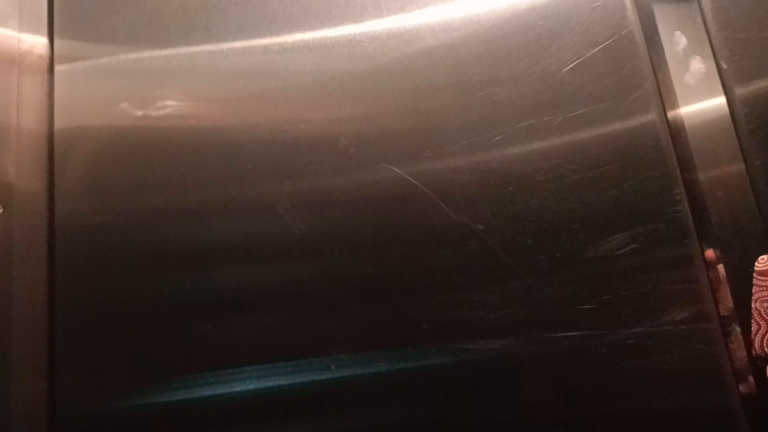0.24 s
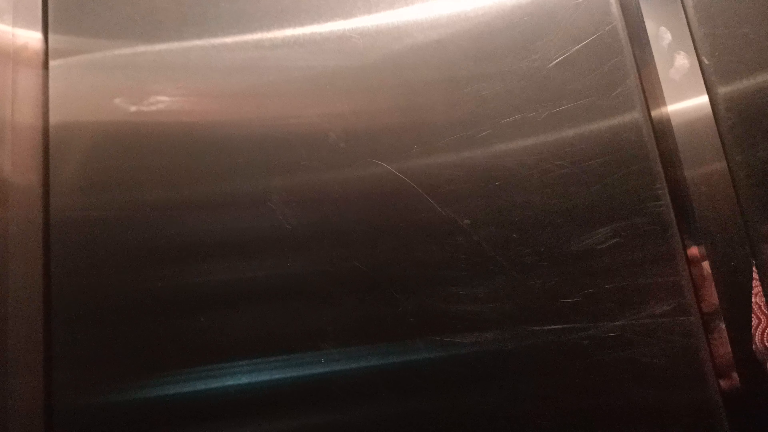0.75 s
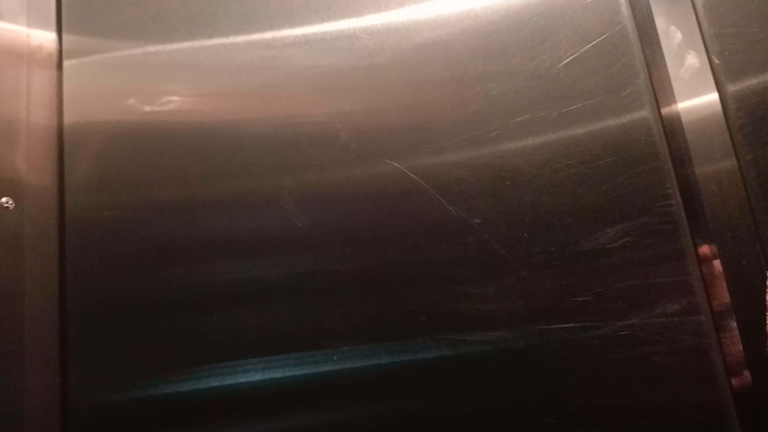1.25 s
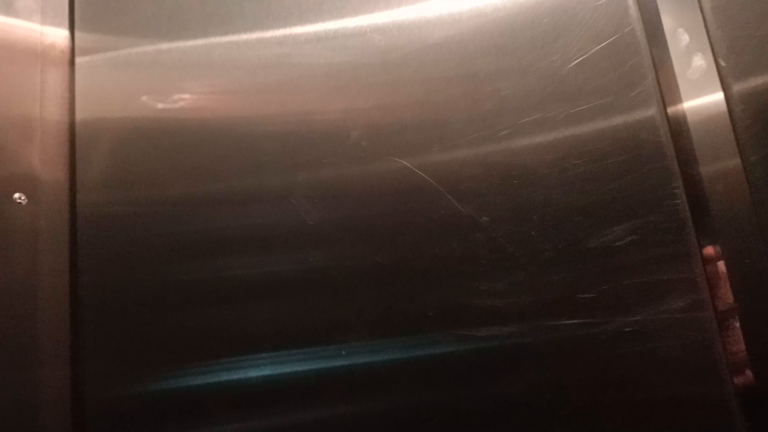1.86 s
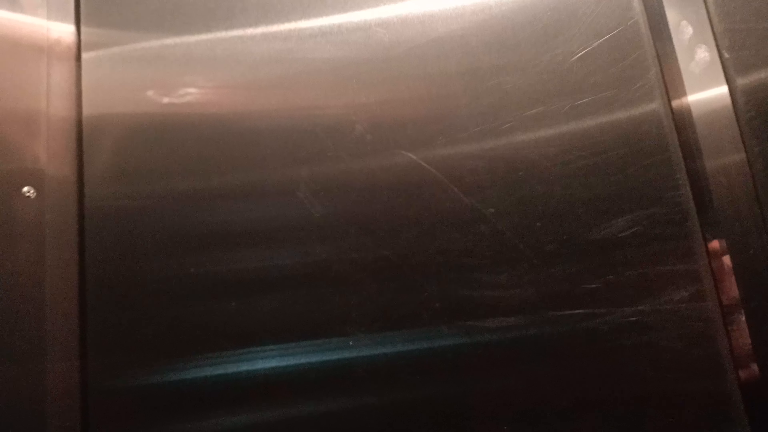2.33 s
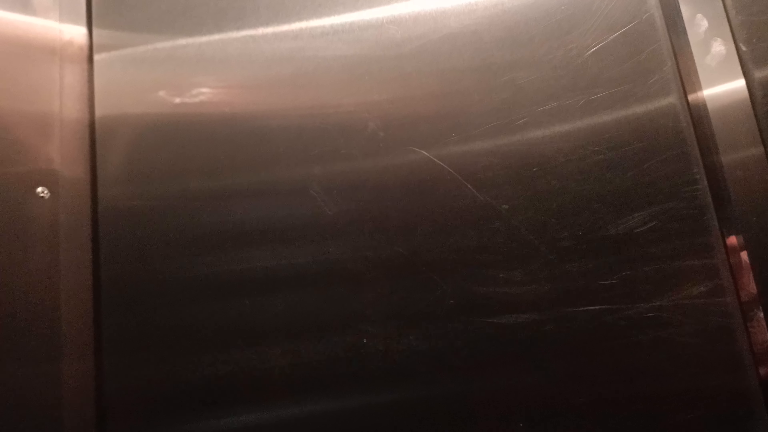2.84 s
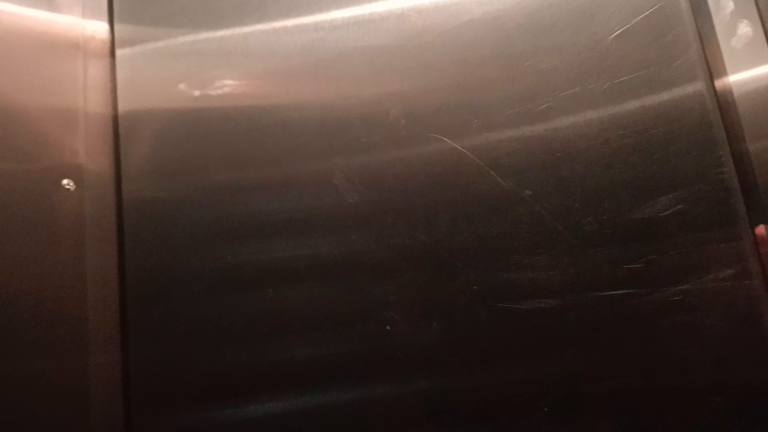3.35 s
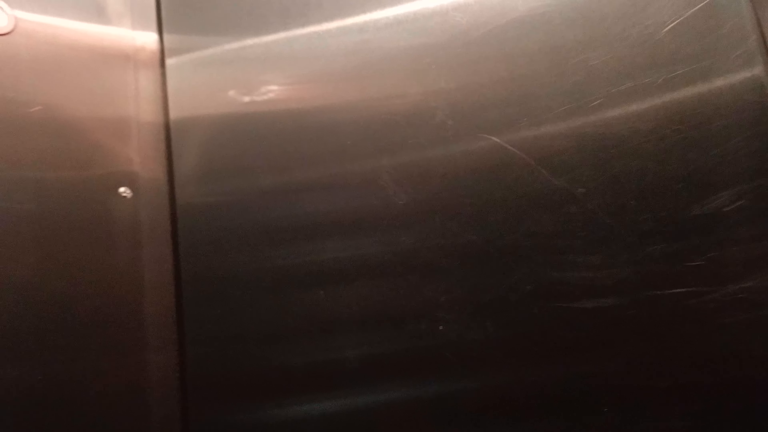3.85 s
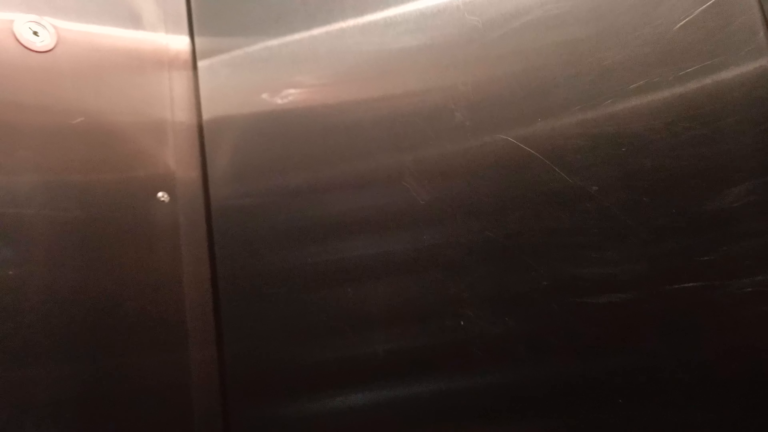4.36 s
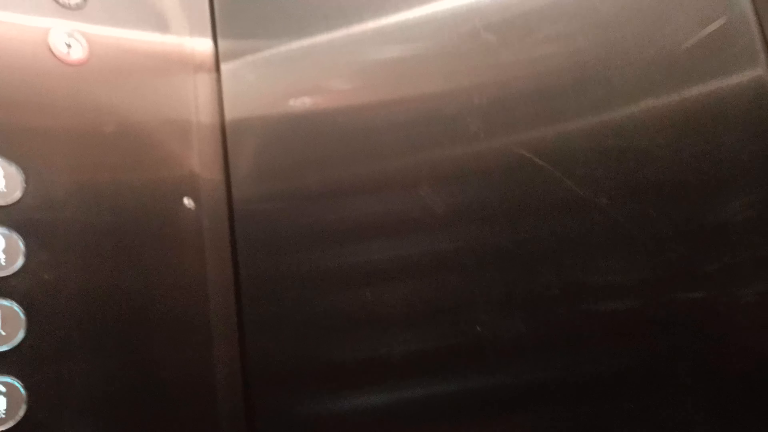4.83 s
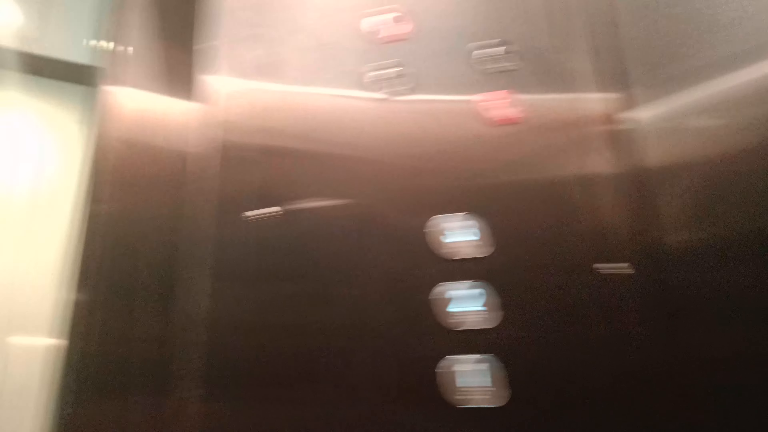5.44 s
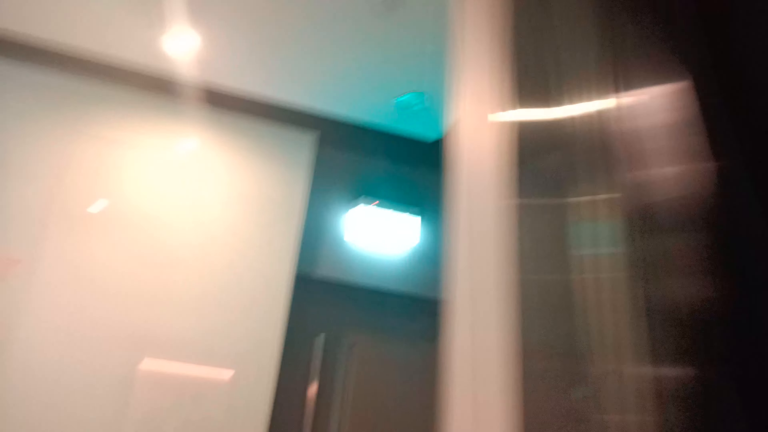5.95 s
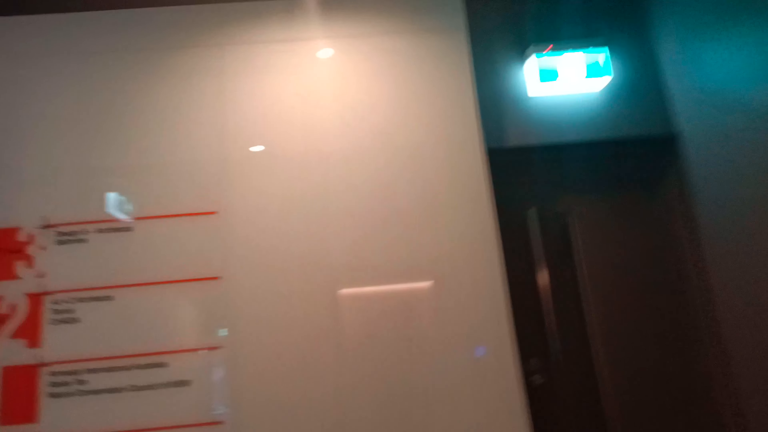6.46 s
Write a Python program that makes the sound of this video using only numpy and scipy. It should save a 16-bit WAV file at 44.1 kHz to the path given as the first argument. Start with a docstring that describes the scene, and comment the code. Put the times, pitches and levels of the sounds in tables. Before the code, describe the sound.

A hand-held phone inside a lift picks up the brief zippy swish of a jacket, a faint jingle and light knocks on the metal panels over quiet air noise. Clothing keeps rustling softly until the doors start to roll open with a low hum and rumble, growing into a gritty rattle with latch clacks. As they ease off, small metal pieces clink and a couple of steps lead out.

```python
"""Steel lift car, doors opening

The car booms softly on its ropes over the air noise of the building. A ribbed jacket swishes,
small metal trinkets jingle and a few light knocks ring the walls. The door motor starts to hum,
rollers rumble along a gritty track, the latch clacks and two steps lead out over the hollow sill.
A hand-held phone hears it all from inside the car."""
import sys
import numpy as np
from scipy import signal
from scipy.fft import rfft, irfft
from scipy.io import wavfile
from scipy.ndimage import uniform_filter1d

SR = 44100
rng = np.random.default_rng(int(sys.argv[2]) if len(sys.argv) > 2 else 0)


def wrap_up_sound(samples):
    """Save the sound to the file named by the first command line argument, as 16-bit audio."""
    columns = np.atleast_2d(samples).T
    # keep every value between -1 and 1, then stretch to whole-number steps
    tamed = np.clip(columns, -1, 1)
    steps = np.round(tamed * 32767).astype(np.int16)
    wavfile.write(sys.argv[1], SR, steps)


N = 295470
TIME = np.arange(N) / SR
HIT_SAMPLES, PORT_LAG_SAMPLES = SR // 2, 21  # length of a one-shot; travel between the phone's ports


def undb(db):
    """Decibels to gain."""
    return 10 ** (np.asarray(db) / 20)


def unit(x):
    """Scale to rms 1."""
    return x / np.sqrt(np.mean(x ** 2))


def even(x, seconds):
    """Ride the level of a noise so that its rms over the given time stays near 1."""
    return x / np.sqrt(uniform_filter1d(np.mean(x ** 2, axis=0), int(seconds * SR)) + 1e-12)


def peaked(x):
    """Scale a hit so that its loudest 4 ms have rms 1."""
    return x / np.sqrt(uniform_filter1d(np.mean(x ** 2, axis=0), size=180).max())


def add(out, s, x):
    """Drop a sound into the mix at s seconds."""
    start = int(s * SR)
    out[:, start:start + x.shape[1]] += x[:, :N - start]


def curves(table):
    """Breakpoint rows (t/s, values...) as one automation curve per value."""
    s, *columns = np.transpose(table)
    return [np.interp(TIME, s, column) for column in columns]


def swells(events):
    """Envelope of bell-shaped swells (middle t/s, length/s, level/dB), summed in power."""
    powers = (undb(db) ** 2 * np.exp(-4 * ((TIME - s) / length) ** 2) for s, length, db in events)
    return np.sqrt(sum(powers))


def fade(t60):
    """One-shot envelope that falls 60 dB in t60 seconds."""
    return np.exp(-np.log(1000) * TIME[:HIT_SAMPLES] / max(t60, .005))


def walk(rate_hz):
    """Random modulator gliding between values with a spread of 1."""
    knots = rng.standard_normal(int(N / SR * rate_hz) + 2)
    return np.interp(TIME * rate_hz, np.arange(len(knots)), knots)


def waver(rate_hz):
    """Two unrelated random modulators of both level and phase."""
    return np.array([walk(rate_hz) + 1j * walk(rate_hz) for _ in range(2)])


def grains(rate_hz, spread_db):
    """Friction texture: two unrelated streams of tiny impacts of uneven size."""
    sizes = undb(spread_db * np.minimum(rng.exponential(size=(2, N)), 5))
    return unit(rng.standard_normal((2, N)) * sizes * (rng.random((2, N)) < rate_hz / SR))


def on_bins(points, size):
    """An EQ curve (f/Hz, level/dB) as dB at each FFT bin."""
    hz, db = np.transpose(points)
    return np.interp(np.log(np.arange(size // 2 + 1) * SR / size + 1), np.log(hz), db)


def colour(x, points):
    """Minimum-phase EQ along a curve (f/Hz, level/dB), so attacks get no pre-ring."""
    size = 8192
    cepstrum = irfft(np.log(undb(on_bins(points, size))))
    cepstrum[1:size // 2] *= 2
    cepstrum[size // 2 + 1:] = 0
    impulse = irfft(np.exp(rfft(cepstrum)))
    return signal.fftconvolve(x, impulse[None], axes=1)[:, :x.shape[1]]


def band(x, hz, q):
    """One resonant band-pass."""
    return signal.lfilter(*signal.iirpeak(min(hz, .45 * SR), max(q, 2.5 * hz / SR), fs=SR), x)


def resonate(x, modes):
    """A bank of narrow resonators (f/Hz, width/Hz, level/dB)."""
    return sum(undb(db) * band(x, hz, hz / width_hz) for hz, width_hz, db in modes)


# stereo width at the phone's two microphone ports: f/Hz, side over mid/dB
STEREO_WIDTH = [(35, -36), (70, -8), (160, -15.5), (260, -10), (420, -1), (600, -4), (1000, 0.5),
                (15000, 0)]
def ports(pair, slant=0.065):
    """Two unrelated signals become left and right: narrow in the bass, wide in the treble."""
    size = pair.shape[1]
    mid, side = rfft(pair)
    width = undb(on_bins(STEREO_WIDTH, size))
    left, right = (mid + np.array([[1], [-1]]) * width * side) / np.sqrt(1 + width ** 2)
    # a share arrives from the left and crosses the phone's length to the other port
    crossing = np.exp(-2j * np.pi * np.arange(len(left)) * PORT_LAG_SAMPLES / size)
    return irfft(np.array([left, (1 - slant) * right + slant * left * crossing]), size)


def ring(modes, scatter_db):
    """A struck body: decaying modes (f/Hz, level/dB, t60/s), weighted anew at every hit."""
    hz, db, t60 = np.transpose(modes)[:, :, None]
    t = TIME[:HIT_SAMPLES]
    weights = undb(db + scatter_db * rng.standard_normal((2, len(modes), 1)))
    phases = 2 * np.pi * rng.random((2, len(modes), 1))
    waves = weights * np.sin(2 * np.pi * hz * t + phases) * np.exp(-np.log(1000) * t / t60)
    attack = 1 - fade(0.0042)
    return ports(waves.sum(axis=1) * attack)


# EQ of a hard contact in the car: f/Hz, level/dB
CRACK_EQ = [(200, 3.5), (700, -1.5), (1200, -2), (2500, -5), (4200, -6.5), (5800, -8), (8000, -21),
            (11000, -22.5), (15500, -18.5)]
def crack(t60, direct=4.0, tail_db=-23, tail_t60=0.36):
    """A hard contact: direct click, dense reflections between the steel walls, a faint tail."""
    burst = rng.standard_normal((2, HIT_SAMPLES)) * (fade(t60) + undb(tail_db) * fade(tail_t60))
    burst[0, 0] += direct
    burst[1, PORT_LAG_SAMPLES] += direct
    return colour(ports(burst), CRACK_EQ)


# resonances of the steel door leaves and hangers: f/Hz, width/Hz, level/dB
STEEL_MODES = [(696, 59, -10), (790, 22, -19), (926, 26, -13), (1083, 32, -16), (1351, 37, -10),
               (1538, 22, -9.5), (1860, 21, -9.5), (2500, 25, -9), (2687, 38, -5), (2970, 160, -7.5),
               (3220, 82, -7), (3485, 59, -8), (3730, 47, -6.5), (4170, 27, -4)]
def steel(x, ring_db):
    """Whatever shakes a door leaf also rings it."""
    return x + undb(ring_db) * resonate(x, STEEL_MODES)


# EQ of the building's air noise: f/Hz, level/dB
AIR_EQ = [(30, -17), (55, 0.5), (75, -2.5), (98, -15), (130, -7.5), (190, -11.5), (320, -18), (500, -22),
          (900, -31.5), (2200, -25.5), (5600, -33.5), (7500, -37.5), (15500, -38.5)]
def ventilation(level_db=-63, drift_db=0.97):
    """The bed: moving air, its level drifting slightly."""
    air = unit(colour(ports(rng.standard_normal((2, N))), AIR_EQ))
    return air * undb(level_db + drift_db * walk(2.34))


# EQ of the car's lowest resonance: f/Hz, level/dB
BOOM_EQ = [(18, -29), (25, -5.5), (32, 0.5), (41, -1), (50, -10), (65, -18), (100, -33.5), (200, -67.5)]
# lurches as weight shifts or the door drive takes up its load: middle t/s, length/s, level/dB
CAR_LURCHES = [(.4, 0.72, -54.5), (1.94, 0.065, -49), (2.58, 0.16, -51), (3.63, 0.2, -40.5),
               (4.05, 0.33, -49.5), (4.43, 0.082, -45), (4.87, 0.16, -43), (5.33, 0.11, -42),
               (6.03, 0.047, -45)]
def car_boom(rest_db=-57, door_coupling_db=-1.5):
    """The car booms on its ropes, more when the doors shake it or it lurches."""
    shaken = undb(DOOR_CRUISE_DB + effort_db() + door_coupling_db)
    strength = np.sqrt(undb(rest_db) ** 2 + shaken ** 2 + swells(CAR_LURCHES) ** 2)
    boom = colour(ports(rng.standard_normal((2, N))), BOOM_EQ)
    return even(boom, seconds=0.15) * strength


# a person shifting about: middle t/s, length/s, cloth level/dB, rumble level/dB
BODY_MOVES = [(0.127, 0.34, -62, -53.5), (0.367, 0.23, -57, -53), (0.546, 0.21, -68, -64),
              (0.804, 0.39, -61.5, -60), (1.07, 0.26, -55.5, -72), (1.248, 0.095, -56.5, -71),
              (1.452, 0.38, -64, -74), (1.877, 0.31, -62.5, -66), (2.165, 0.31, -64.5, -62),
              (2.403, 0.15, -59.5, -82), (2.59, 0.15, -74.5, -60.5), (3.036, 0.25, -58.5, -65),
              (3.398, 0.27, -55.5, -69), (3.95, 0.52, -64.5, -59), (4.62, 0.41, -61, -76),
              (5.11, 0.42, -54, -78), (5.792, 1, -57, -68), (6.638, 0.5, -52, -67)]
# EQ of a low, hollow rumble: f/Hz, level/dB
RUMBLE_EQ = [(32, -23), (62, -7.5), (97, -7.5), (135, -3.5), (172, -5.5), (215, -3.5), (285, -15.5),
             (328, -10.5), (419, -15.5), (452, -20), (487, -17.5), (520, -22), (680, -60), (1140, -120)]
def handling_rumble(gain_db=-2):
    """The handled phone and a shifting body give a faint low rumble."""
    movement = swells((s, length, db) for s, length, _, db in BODY_MOVES)
    rumble = colour(ports(grains(2500, 2.6)), RUMBLE_EQ)
    return even(rumble, seconds=0.0226) * movement * undb(gain_db)


# scuffs of jacket cloth and shoes: middle t/s, length/s, level/dB
DULL_SCUFFS = [(.165, 0.04, -51), (.35, 0.1, -51), (1.767, 0.053, -56.5), (1.93, 0.082, -61.5),
               (2.093, 0.19, -61), (2.287, 0.057, -55.5), (2.42, 0.019, -54), (2.517, 0.066, -61.5),
               (2.8, 0.24, -72), (3.075, 0.032, -58), (6.08, 0.093, -53.5), (6.49, 0.083, -54)]
# EQ of a dull scuff: f/Hz, level/dB
SCUFF_EQ = [(150, -2), (230, 12.5), (290, 4), (380, 10.5), (480, 1.5), (650, 4), (1000, -4), (1800, -3),
            (2200, -1), (2700, -6.5), (4000, -5), (7000, -16.5), (15000, -35)]
def scuffs():
    """Jacket cloth and shoes drag briefly with a dull, grainy scuff."""
    return unit(colour(ports(grains(4500, 1.0)), SCUFF_EQ)) * swells(DULL_SCUFFS)


# thin, faint scrapes before the doors move: middle t/s, length/s, level/dB, f/Hz
THIN_SCRAPES = [(1.195, 0.052, -64.5, 1080), (1.235, 0.036, -61, 2010), (2.088, 0.032, -64, 1880),
                (2.924, 0.22, -70, 2160)]
def scrapes(q=9):
    """Something drags lightly and sings in one narrow band."""
    grit = ports(grains(4500, 1.5))
    return sum(unit(band(band(grit, hz, q), hz, q / 2)) * swells([(s, length, db)])
               for s, length, db, hz in THIN_SCRAPES)


# EQ of rubbing cloth: f/Hz, level/dB
CLOTH_EQ = [(150, -13.5), (400, -0.5), (900, -6), (2000, -2.5), (3400, -2.5), (4500, -4.5), (5800, -3.5),
            (7500, -18), (10000, -21.5), (14000, -16.5), (16000, -16)]
def rustle(gain_db=-0.75, flicker_db=2.05):
    """Folds of clothing rub in fine grains at every move, coloured by the steel close by."""
    movement = swells((s, length, db) for s, length, db, _ in BODY_MOVES)
    rub = steel(colour(ports(grains(14000, 0.99)), CLOTH_EQ), ring_db=-1)
    return unit(rub) * movement * undb(gain_db + flicker_db * walk(35))


# an arm swings out, breaks into a low scrape and swings slowly back:
# t/s, rib rate/Hz, level/dB, second partial over first/dB, hiss focus f/Hz, roughness/0-1
ARM_SWING = [(0, 533.3, -46.5, 20, 3278, 0.03), (.03, 542.7, -39.5, 3, 3990, 0),
             (.06, 537, -44, -14, 2900, .06), (.082, 640.5, -40, -3, 2900, .09),
             (.108, 816.4, -42.5, 0, 3935, 0.06), (.135, 768.6, -44, 2, 3890, .12),
             (.152, 631, -40, -13.5, 2804, 0.13), (.168, 428.4, -44.5, -8, 2200, .35),
             (.195, 250.5, -45.5, -9, 1990, 0.36), (.245, 182.1, -60, -5, 2004, 0.17),
             (.305, 222.4, -47.5, -16, 2020, 0.07), (.36, 333.7, -52.5, 8, 2000, .3),
             (.39, 245.5, -52, -12, 1986, 0.07), (.47, 195.4, -53.5, -13, 2040, 0.12)]
def jacket_swish(tone_db=-1, hiss_db=-7.5, sing_db=-8, snag_db=2, flutter=0.44, patchy_db=3):
    """Ribs of cloth catch and slip: a rough pitch that follows the arm's speed, hiss at every rib."""
    rib_hz, db, second_db, focus_hz, roughness = curves(ARM_SWING)
    jitter = 1 + roughness * np.array([walk(500), walk(500)])
    phase = 2 * np.pi * np.cumsum(rib_hz * jitter, axis=1) / SR
    tone = 0
    # threads rub slightly out of step, so every partial wavers and breaks up by itself
    for k, gain in enumerate([1, undb(second_db), undb(second_db - 12)], start=1):
        grip = undb(patchy_db * walk(69.4)) * (1 + flutter * waver(200 * k))
        tone = tone + gain * np.real(grip * np.exp(1j * k * phase))
    # the stretched cloth favours one band of the hiss, which moves as it tightens
    sing = unit(ports(np.real(waver(1500) * np.exp(2j * np.pi * np.cumsum(focus_hz) / SR))))
    rub = unit(colour(ports(grains(9000, 0.86)), CLOTH_EQ))
    rib_pulse = 1 + 0.63 * np.cos(phase)
    speed_gain = undb(8 * np.log2(rib_hz / 553))  # 8 dB more hiss per octave of rib rate
    hiss = (undb(hiss_db) * rub + undb(sing_db) * sing) * rib_pulse * speed_gain
    # single threads catch and let go
    snags = roughness * undb(snag_db) * unit(colour(ports(grains(1500, 1.5)), SCUFF_EQ))
    swish = undb(tone_db) * even(ports(tone), seconds=0.046) + hiss + snags
    return undb(db) * swish * (TIME < ARM_SWING[-1][0])


# the bunch of trinkets swinging: middle t/s, length/s, level/dB, f/Hz
TRINKET_SWINGS = [(.27, 0.089, -66.5, 5520), (.6, 0.44, -78, 5650), (3.496, 0.049, -68.5, 11800),
                  (3.517, 0.13, -71, 15800), (3.76, .1, -73, 15650), (3.87, 0.097, -67, 15500),
                  (5.795, 0.065, -66, 5500), (6.37, 0.13, -64, 5470)]
def tinkle(width_hz=230, flicker_db=3.5):
    """Swinging trinkets keep brushing each other and hold a faint, flickering ring."""
    brush = rng.standard_normal((2, N))
    shimmer = 0
    for s, length, db, hz in TRINKET_SWINGS:
        q = hz / width_hz
        shimmer = shimmer + unit(band(band(brush, hz, q), hz, q / 2)) * swells([(s, length, db)])
    return shimmer * undb(flicker_db * walk(45))


# trinkets touching: t/s, level/dB, focus f/Hz, Q of the focus
TRINKET_HITS = [(0.215, -50, 5470, 0.27), (.218, -53, 15650, 9), (0.431, -44.5, 5510, 0.48),
                (0.441, -55, 5500, 0.29), (0.602, -57, 11700, 0.8), (3.505, -51, 15500, 14),
                (3.708, -54, 15400, 12), (3.835, -64, 11800, 5), (4.153, -49.5, 11740, 18),
                (4.425, -53.5, 5140, 23), (4.866, -53.5, 5930, 8.9), (6.208, -44, 5420, 2.8)]
# their ring: f/Hz, width/Hz, level/dB
TRINKET_MODES = [(5490, 80, 10.5), (5480, 150, -5), (6220, 67, 1.5), (11910, 100, 2), (13750, 200, -15),
                 (15500, 180, -15)]
def jingles(gain_db=-3, ping_t60=0.051):
    """Small metal pieces chatter and one of them pings, more clearly where the focus is narrow."""
    out = np.zeros((2, N))
    for s, db, hz, q in TRINKET_HITS:
        chatter = rng.standard_normal((2, HIT_SAMPLES)) * (fade(0.12) + undb(-17) * fade(0.097))
        cloud = peaked(band(band(resonate(chatter, TRINKET_MODES), hz, q), hz, q))
        ping = peaked(ring([(hz, 0, ping_t60), (hz * 0.93, -9, ping_t60)], scatter_db=1.8))
        add(out, s, undb(db + gain_db) * (cloud + q / (q + 2) * ping))
    return out


# shakes of the whole bunch: t/s, level/dB, t60/s
BUNCH_SHAKES = [(.217, -60, .07), (0.431, -45.5, 0.14), (.603, -57, 0.096), (3.706, -52.5, 0.12),
                (4.422, -58, 0.13), (6.203, -41, 0.054), (6.21, -40, 0.33)]
# EQ of their splash: f/Hz, level/dB
SPLASH_EQ = [(500, -18), (1500, -4), (2500, 0), (4200, 3), (5300, -2), (6900, 8.5), (8500, 4.5),
             (13500, 8.5), (16000, -2)]
def chinks(gain_db=-1):
    """Trinkets shaken together collide in one bright splash."""
    out = np.zeros((2, N))
    for s, db, t60 in BUNCH_SHAKES:
        add(out, s, undb(db + gain_db) * peaked(colour(crack(t60), SPLASH_EQ)))
    return out


# modes of the largest trinket: f/Hz, level/dB, t60/s
CLINK_MODES = [(2520, -16, .17), (3320, -2.5, 0.098), (3900, -2, .1), (4250, -1, 0.17), (4400, -1, .1),
               (5260, 6.5, .12), (5380, 2, 0.15), (5660, -13, .16), (6450, -6, 0.11), (6880, -17, .14)]
def clink(at_s=6.207, level_db=-34.5, halo_db=-7):
    """The largest trinket is struck once; the steel walls smear its ring into a halo."""
    out = np.zeros((2, N))
    halo = band(rng.standard_normal((2, HIT_SAMPLES)) * fade(0.31), hz=5400, q=16)
    strike = ring(CLINK_MODES, scatter_db=0.89)
    add(out, at_s, undb(level_db) * (peaked(strike) + undb(halo_db) * peaked(halo)))
    return out


# knocks on the car: t/s, thud level/dB, crack level/dB, contact f/Hz
WALL_KNOCKS = [(0.552, -49, -56, 216), (0.793, -40, -46, 170), (0.801, -39, -46, 149),
               (1.244, -52.5, -72, 166), (1.92, -49.5, -62, 298), (2.423, -53, -64, 382),
               (3.069, -49, -68, 220), (3.273, -45.5, -74, 160.7), (3.352, -44, -52, 175),
               (4.205, -52, -63, 217), (6.144, -42.5, -55, 215)]
# modes of the wall panels: f/Hz, level/dB, t60/s
WALL_MODES = [(115, -4, 0.34), (172.8, -4, 0.24), (210, -5, 0.158), (288.5, -16.5, 0.94),
              (337.5, -9.5, 0.4), (398.4, -1, 0.19), (493, -0.5, 0.1), (660, 1, 0.13), (920, -20, 0.11),
              (1210, -22, 0.071)]
def knocks(thud_gain_db=-2, crack_gain_db=-1):
    """Light blows ring the wall panels, favouring the modes near the pitch of the contact."""
    out = np.zeros((2, N))
    for s, thud_db, crack_db, hz in WALL_KNOCKS:
        thud = band(ring(WALL_MODES, scatter_db=1.8), hz, q=2.54)
        add(out, s, undb(thud_db + thud_gain_db) * peaked(thud))
        add(out, s, undb(crack_db + crack_gain_db) * peaked(crack(t60=0.22)))
    return out


# steel panels flexing: middle t/s, length/s, level/dB, f/Hz
PANEL_FLEXES = [(0.809, .028, -46, 122.3), (0.84, 0.054, -49.5, 170.6), (0.862, .04, -58, 336.6),
                (3.964, .07, -57, 226.5), (4.217, 0.081, -53.5, 219), (5.03, 0.065, -40, 167.6),
                (5.09, 0.045, -41.5, 66.2), (5.155, 0.075, -41, 177), (5.292, 0.073, -41.5, 62),
                (5.69, 0.056, -48, 67)]
def panel_drumming(wander=0.01995):
    """Knocked or pulled along, the hollow panels flex and drum at one low resonance after another."""
    out = 0
    for s, length, db, hz in PANEL_FLEXES:
        cycles = np.cumsum(hz * (1 + wander * walk(30))) / SR + rng.random()
        out = out + np.sqrt(2) * np.sin(2 * np.pi * cycles) * swells([(s, length, db)])
    return out


# shoes meeting sill and floor: t/s, slap level/dB, thump level/dB, slap t60/s
FOOT_CONTACTS = [(5.843, -55, -47.5, 0.035), (6.43, -65, -48, 0.18), (6.523, -34.5, -42.5, 0.14),
                 (6.551, -37.5, -44, 0.065), (6.679, -33, -50, 0.037)]
# EQ of a sole's slap: f/Hz, level/dB
SOLE_EQ = [(300, -8), (600, -5), (900, -2), (1300, 2.5), (4500, 8.5), (7000, 1), (14000, -1)]
# modes of the sill: f/Hz, level/dB, t60/s
SILL_MODES = [(293, -4, 0.23), (408, 3.5, 0.29), (517, -1.5, 0.21), (565, -7.5, 0.3), (673, -5, 0.15),
              (1220, -7, 0.18), (1580, -9, 0.11)]
def footsteps(slap_gain_db=-1):
    """Heel and sole land with a dry slap and ring the hollow sill."""
    out = np.zeros((2, N))
    for s, slap_db, thump_db, t60 in FOOT_CONTACTS:
        slap = colour(crack(t60, direct=14.4), SOLE_EQ)
        add(out, s, undb(slap_db + slap_gain_db) * peaked(slap))
        add(out, s, undb(thump_db) * peaked(ring(SILL_MODES, scatter_db=1.9)))
    return out


DOOR_CRUISE_DB = -50  # door rumble at ordinary effort
# the drive unlocks, hauls the leaves open and eases off: t/s, rumble level/dB
DOOR_EFFORT = [(3.2, -64), (3.28, -55), (3.41, -52), (3.8, -58), (4.2, -60), (4.5, -55.5), (4.72, -46.5),
               (4.97, -43), (5.0, -41.5), (5.16, -41), (5.42, -43.5), (5.6, -50), (5.95, -49.5),
               (6.35, -57), (6.7, -51)]
def effort_db():
    """How far the door drive works above its ordinary effort; far below it until it starts."""
    db, = curves(DOOR_EFFORT)
    return np.where(TIME < DOOR_EFFORT[0][0], -200, db - DOOR_CRUISE_DB)


# motor partials at full speed: f/Hz, level/dB
MOTOR_TONES = [(136, 2), (226, -1.5), (272, -3.5), (325, -9.5)]
def door_motor(hum_db=-56, load_slope=0.35, brake_s=5.9, brake_length_s=0.24, creep_speed=0.72):
    """The door motor hums unevenly, louder under load, and slows near the end of the travel."""
    speed = np.interp(TIME, [brake_s, brake_s + brake_length_s], [1, creep_speed])
    motor_time = np.cumsum(speed * (1 + 0.01245 * walk(15))) / SR
    hum = 0
    for hz, db in MOTOR_TONES:
        flicker_db = 7.2 * np.array([walk(16), walk(24)])
        phase = 2 * np.pi * (hz * motor_time + rng.random((2, 1)))
        hum = hum + undb(db + flicker_db) * np.sin(phase)
    load = uniform_filter1d(undb(hum_db + load_slope * effort_db()), size=4000)
    return unit(ports(hum)) * load


# hanger rattles: t/s, level/dB, focus f/Hz
HANGER_HITS = [(3.301, -56, 2500), (3.35, -52, 1400), (3.372, -55, 1450), (3.403, -56, 3800),
               (3.463, -56, 2960), (3.508, -57.5, 1450), (3.592, -63, 1300), (4.995, -43, 1710),
               (5.02, -44.5, 800), (5.048, -42, 1050), (5.085, -48, 3300), (5.108, -46, 850),
               (5.174, -45, 1590), (5.222, -53.5, 3500), (5.257, -46.5, 1490), (5.285, -49, 1900)]
def hangers(gain_db=-1, ring_t60=0.088, tick_db=-3, detune=0.033):
    """Loose hangers knock on the leaves; steel modes ring on, tuned a little differently each hit."""
    out = np.zeros((2, N))
    for s, db, hz in HANGER_HITS:
        modes = [(mode_hz * (1 + detune * rng.standard_normal()), mode_db, ring_t60)
                 for mode_hz, _, mode_db in STEEL_MODES]
        clang = peaked(band(ring(modes, scatter_db=1.9), hz, q=5.2))
        tick = peaked(band(crack(t60=0.044), hz, q=0.84))
        add(out, s, undb(db + gain_db) * (clang + undb(tick_db) * tick))
    return out


# sharp steel clacks: t/s, level/dB, centre f/Hz, t60/s
STEEL_CLACKS = [(.547, -50, 2190, 0.033), (0.79, -44, 1150, 0.17), (3.702, -52.5, 1900, 0.085),
                (3.8, -53, 3200, 0.16), (3.955, -54, 2680, 0.13), (4.428, -56.5, 3960, 0.12),
                (4.939, -39, 3350, 0.12), (4.992, -30, 2700, 0.15), (5.343, -35, 4000, 0.15),
                (5.439, -39.5, 2700, 0.088), (5.778, -49, 3070, 0.2), (5.843, -42.5, 1013, 0.13),
                (5.868, -48.5, 1010, 0.3), (5.924, -47, 1960, 0.051), (6.035, -49.5, 885, 0.055),
                (6.209, -54, 3500, 0.08)]
def clacks(gain_db=-4):
    """Hard contacts ring the steel: the door latch, plus the edge of knocks, steps and clinks."""
    out = np.zeros((2, N))
    for s, db, hz, t60 in STEEL_CLACKS:
        add(out, s, undb(db + gain_db) * peaked(band(crack(t60), hz, q=1)))
    return steel(out, ring_db=5)


# rollers meeting joints in the track: t/s, level/dB, focus f/Hz
TRACK_JOINTS = [(3.385, -41, 169), (3.43, -49, 200), (3.489, -45.5, 90), (3.524, -44.5, 150),
                (3.61, -46.5, 80), (3.69, -52, 140), (3.93, -50.5, 220), (4.085, -50, 150), (4.72, -49, 85),
                (4.85, -45, 90), (5.003, -37, 250), (5.058, -37, 353), (5.11, -37, 260), (5.175, -37, 400),
                (5.268, -37.5, 215)]
# modes of the hollow door leaf: f/Hz, level/dB, t60/s
LEAF_MODES = [(65, -0.5, 0.23), (87, -2.5, 0.17), (135.4, -1.5, 0.39), (175, -1, 0.26), (220.2, 2, 0.14),
              (271, -8, 0.27), (327.7, -6.5, 0.26), (377, -10, 0.18), (430, -6, 0.15)]
def roller_bumps(gain_db=-1):
    """A roller drops over a joint and the whole hollow leaf thuds."""
    out = np.zeros((2, N))
    for s, db, hz in TRACK_JOINTS:
        thud = band(ring(LEAF_MODES, scatter_db=2), hz, q=1.12)
        add(out, s, undb(db + gain_db) * peaked(thud))
    return out


# EQ of the rollers' growl: f/Hz, level/dB
GROWL_EQ = [(200, -22.5), (350, 2.5), (480, -1), (680, -3), (850, -10), (1200, -9.5), (2500, -28),
            (6000, -44)]
# EQ of the running rattle: f/Hz, level/dB
RATTLE_EQ = [(400, -18.5), (800, 7), (1100, 5), (1400, 6), (2200, 0.5), (3600, -3.5), (6000, -17),
             (9000, -29.5)]
def door_roll(growl_db=-63, rattle_db=-64, rattle_slope=1.4, flutter_db=3.5, panel_db=-4):
    """Rollers on a gritty track shake the hollow panels; growl and rattle grow with the effort."""
    effort = effort_db()
    rolling = colour(ports(grains(2500, 2.1)), RUMBLE_EQ)
    panel_tone = undb(panel_db) * band(rolling, hz=169, q=26)
    rumble = even(rolling + panel_tone, seconds=0.078)
    growl = even(colour(ports(grains(700, 1.6)), GROWL_EQ), seconds=0.03)
    # thin steel sheets give every grain a short, many-toned ring
    sheet = rng.standard_normal((2, HIT_SAMPLES)) * fade(0.22)
    sheet[:, 0] += 18  # the grain's own click
    ringing_grit = signal.fftconvolve(grains(700, 0.73), sheet, axes=1)[:, :N]
    rattle = even(colour(ports(ringing_grit), RATTLE_EQ), seconds=0.039)
    rough = growl * undb(growl_db + effort) + rattle * undb(rattle_db + rattle_slope * effort)
    flutter = undb(flutter_db * walk(25))
    return rumble * undb(DOOR_CRUISE_DB + effort) + steel(rough * flutter, ring_db=3)


def scene(near_pan_db=1.5, swish_pan_db=0.45, doorway_pan_db=1.1):
    """The mix: bed and low sounds in the middle, the brighter sounds leaning left."""
    lean = np.array([[1], [-1]])
    near = (rustle() + scrapes() + jingles() + chinks() + tinkle() + clink()) * undb(near_pan_db * lean)
    jacket = jacket_swish() * undb(swish_pan_db * lean)
    doorway = (clacks() + hangers() + footsteps()) * undb(doorway_pan_db * lean)
    bed = car_boom() + ventilation() + handling_rumble() + scuffs()
    doors = door_roll() + roller_bumps() + panel_drumming() + door_motor()
    return bed + near + jacket + knocks() + doorway + doors


def record(dry, top_hz=15900):
    """The phone cuts the top with a steep low-pass."""
    return signal.sosfilt(signal.ellip(10, .2, 70, top_hz, fs=SR, output="sos"), dry)


dry = scene()
out = record(dry)
wrap_up_sound(out)
```